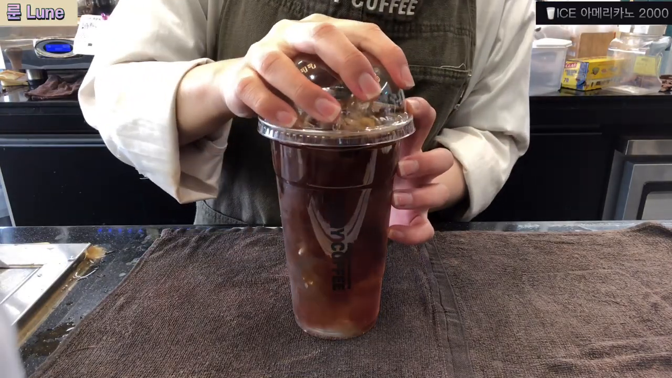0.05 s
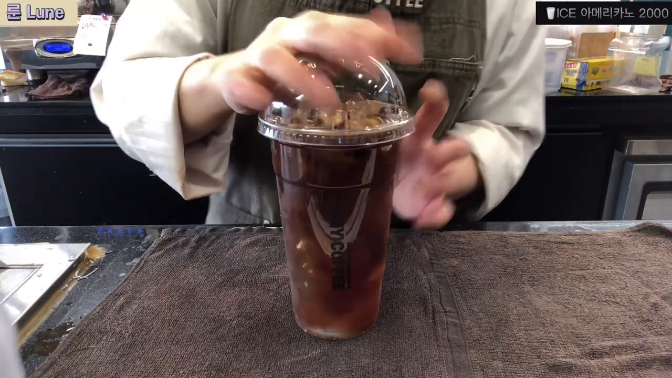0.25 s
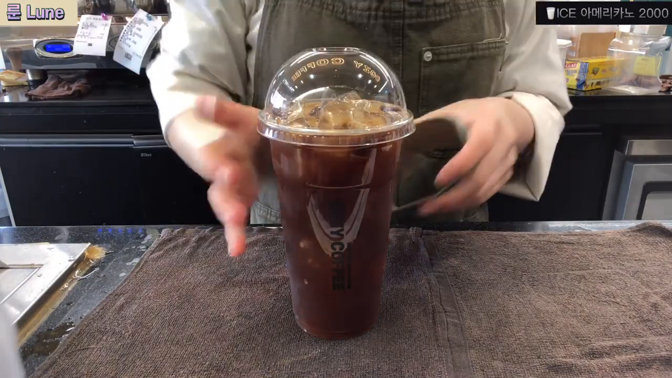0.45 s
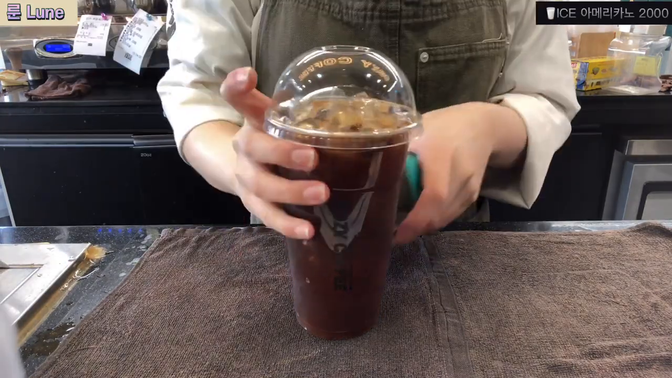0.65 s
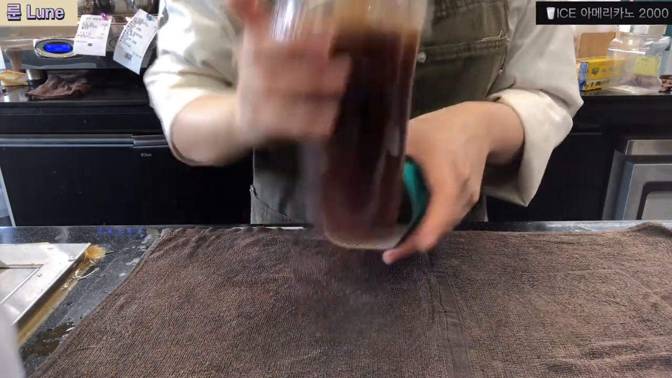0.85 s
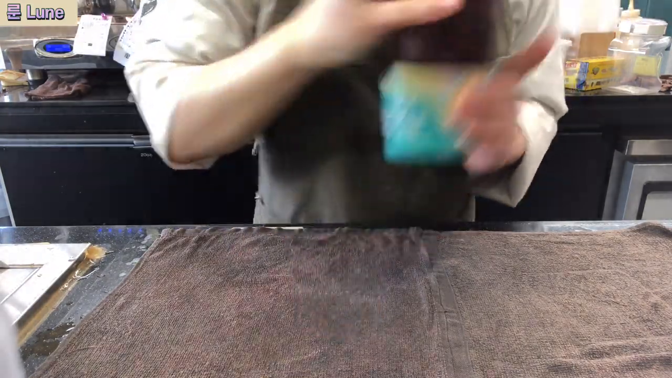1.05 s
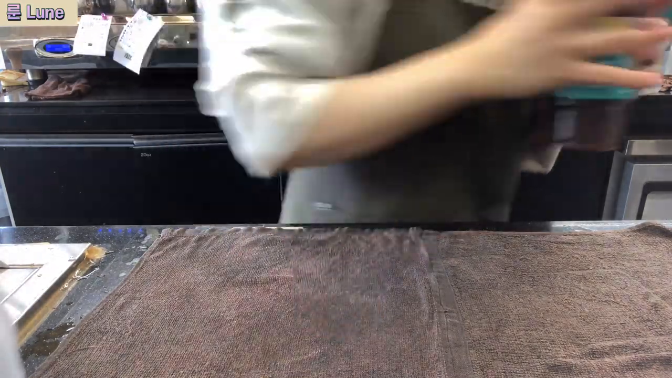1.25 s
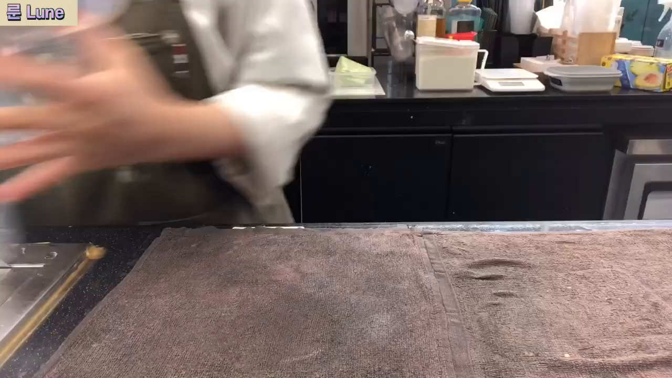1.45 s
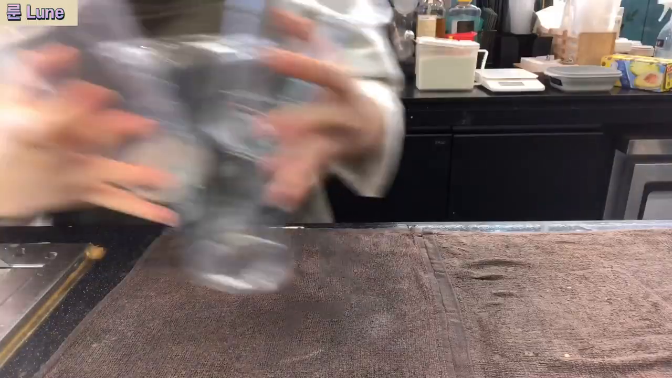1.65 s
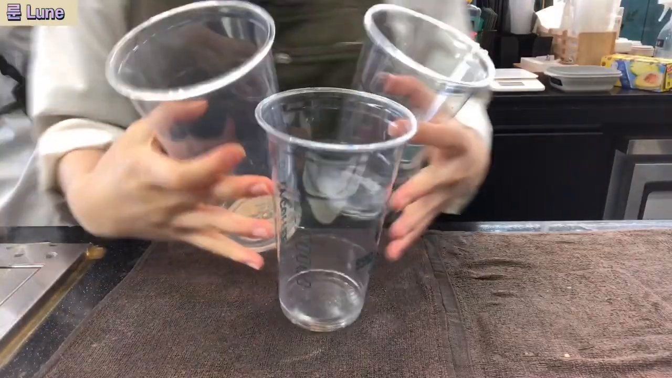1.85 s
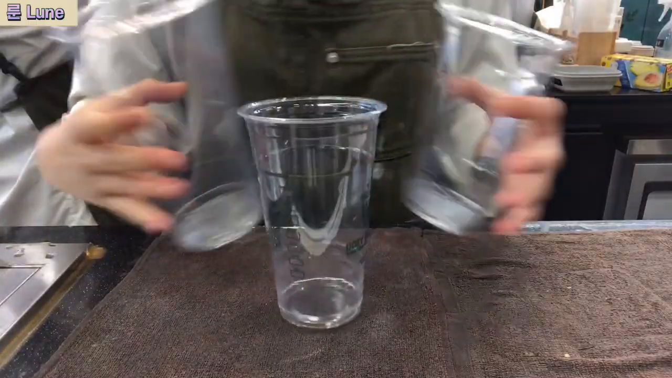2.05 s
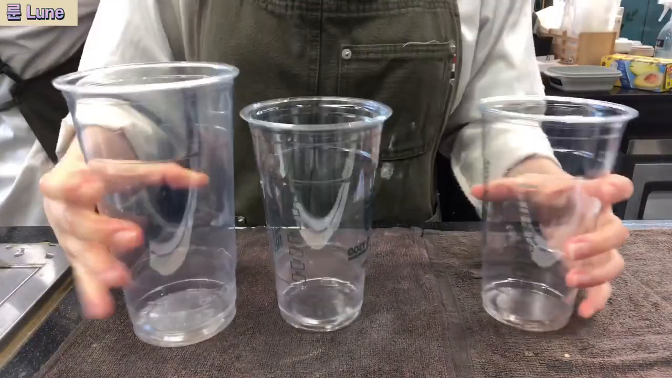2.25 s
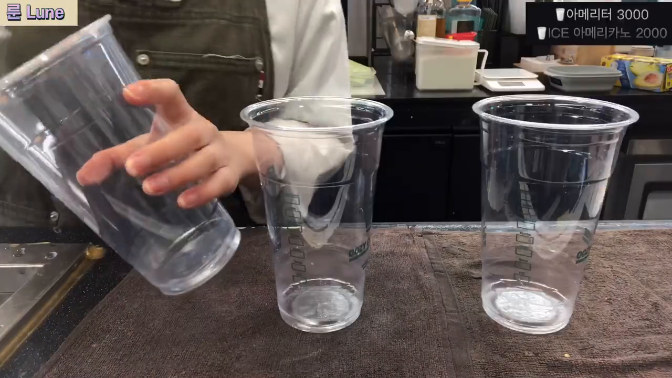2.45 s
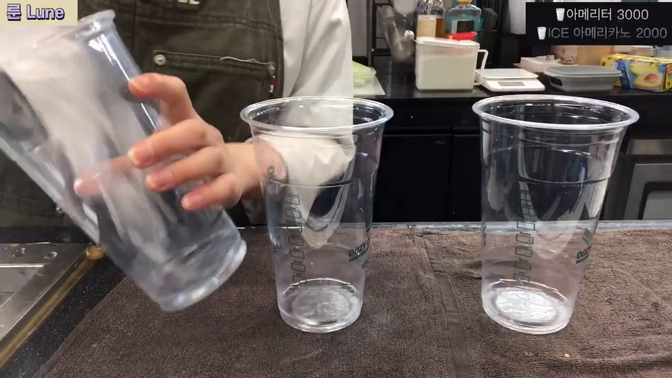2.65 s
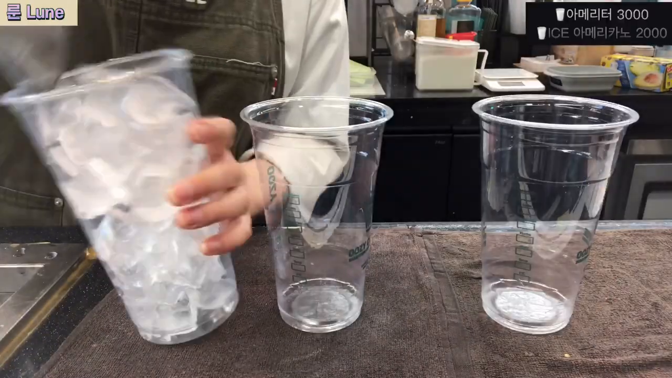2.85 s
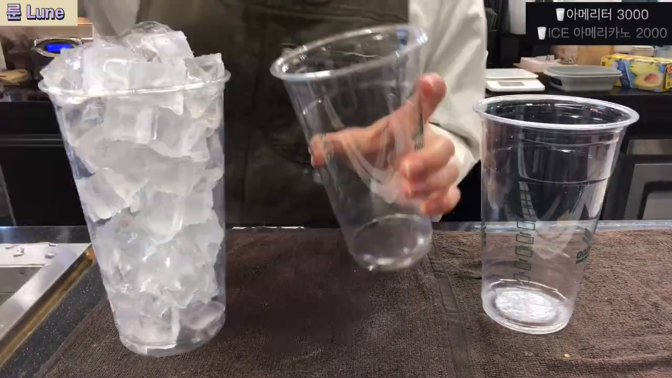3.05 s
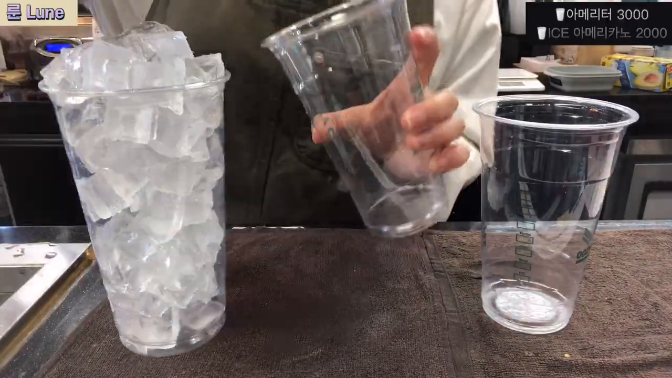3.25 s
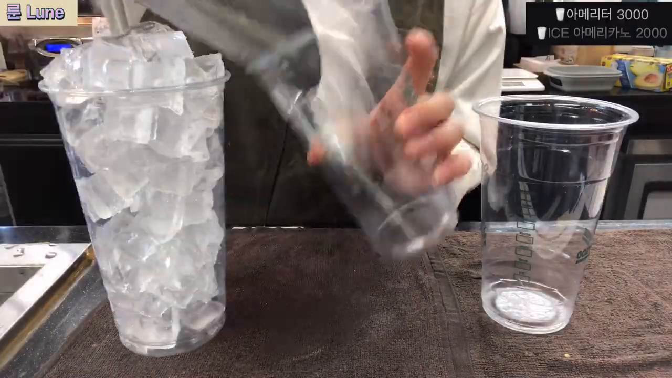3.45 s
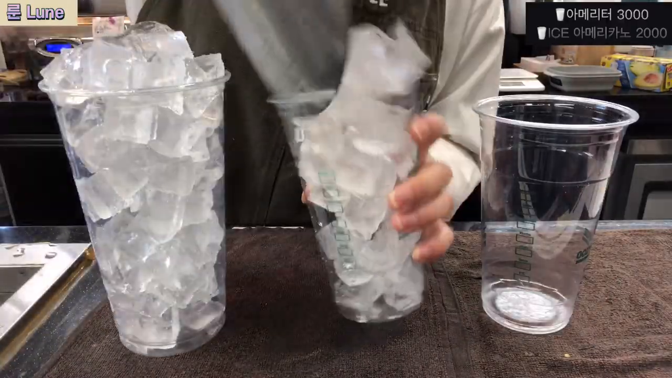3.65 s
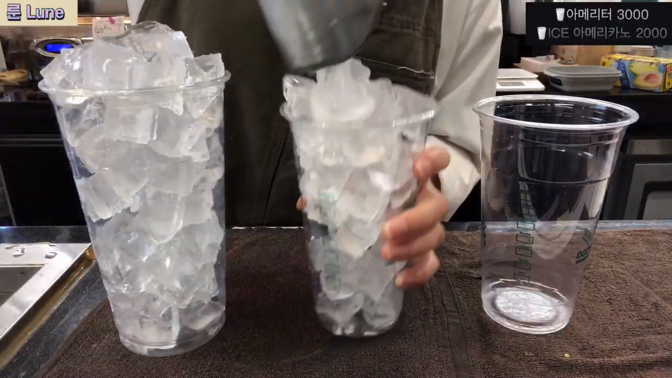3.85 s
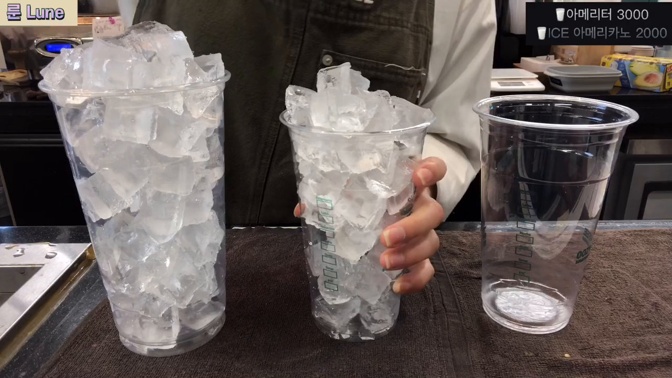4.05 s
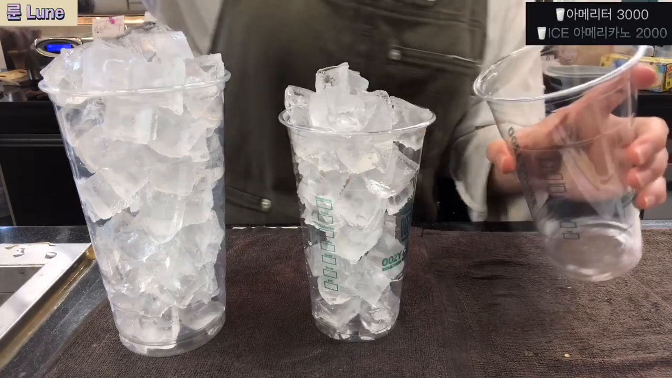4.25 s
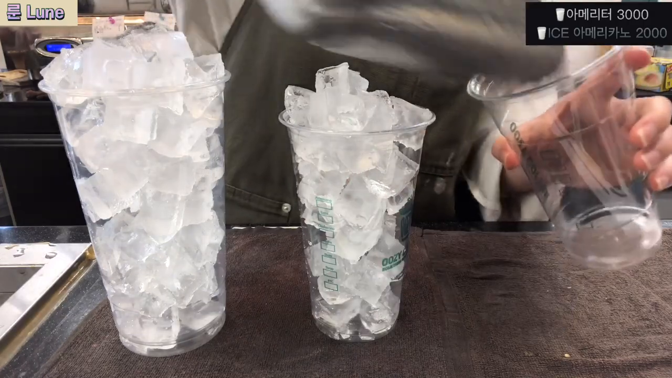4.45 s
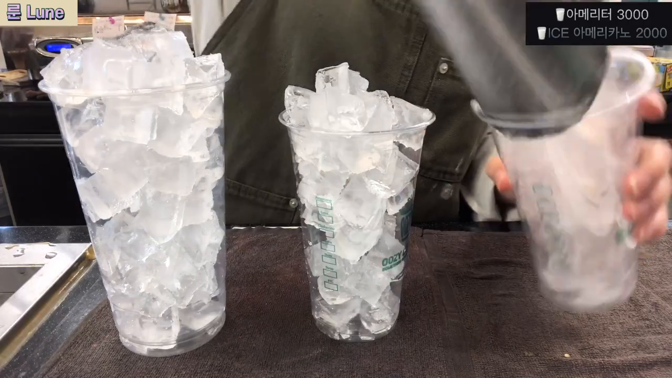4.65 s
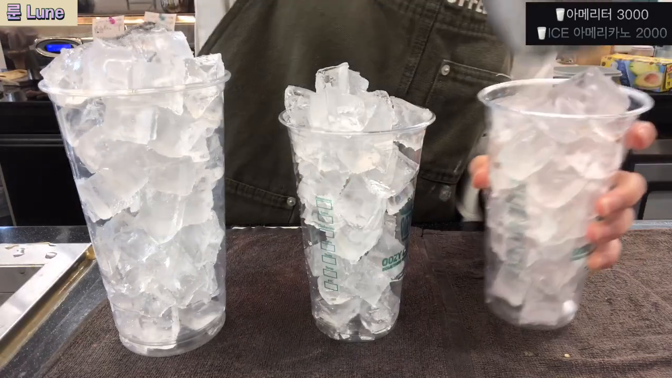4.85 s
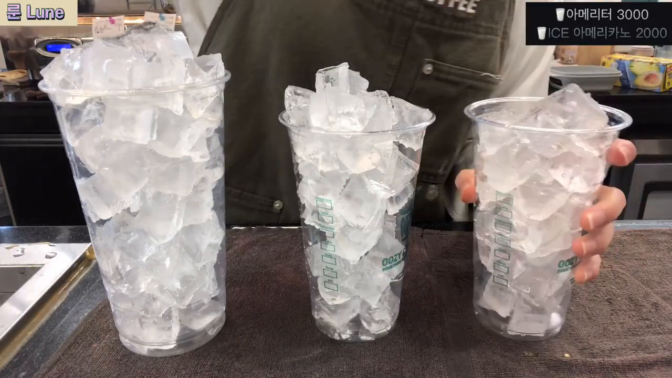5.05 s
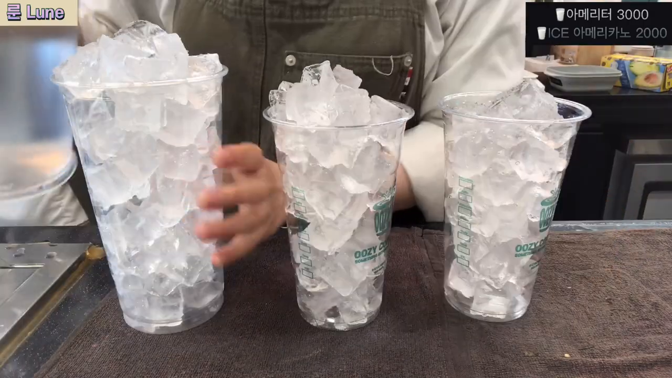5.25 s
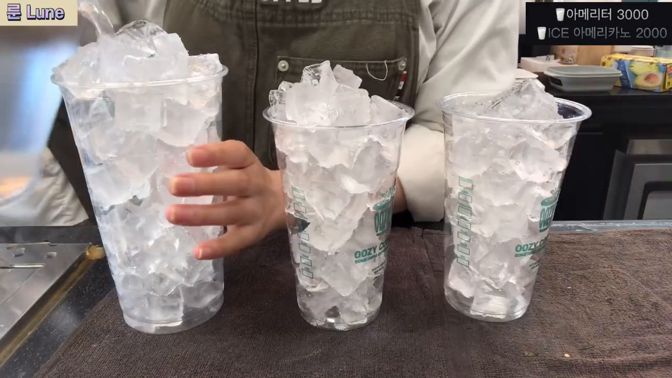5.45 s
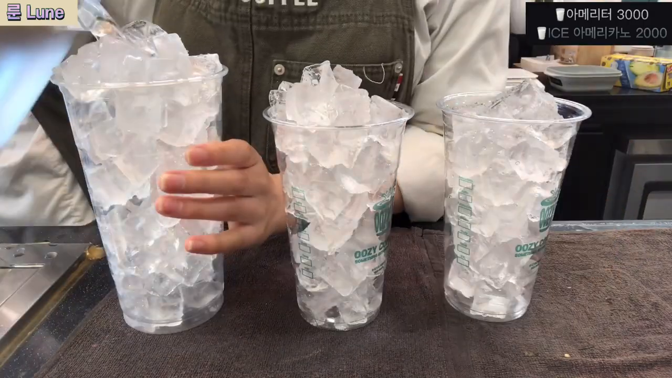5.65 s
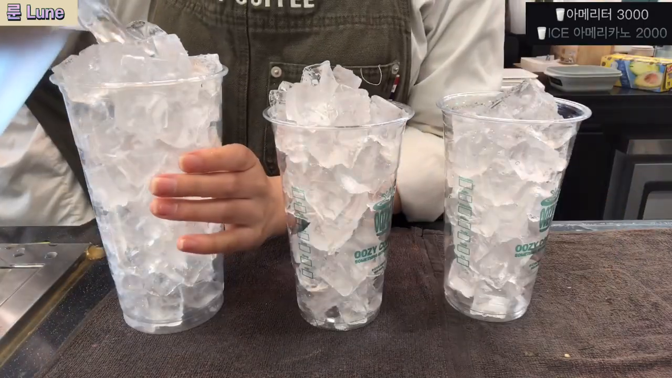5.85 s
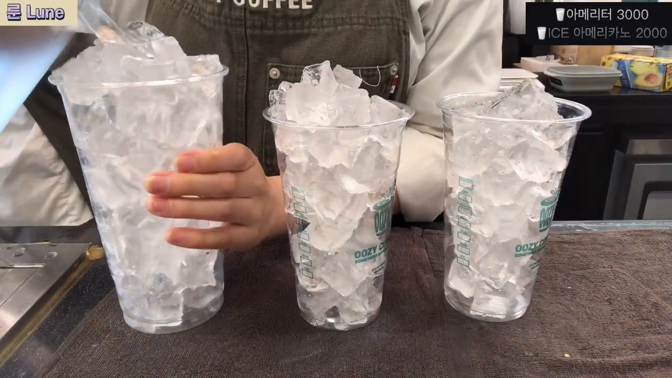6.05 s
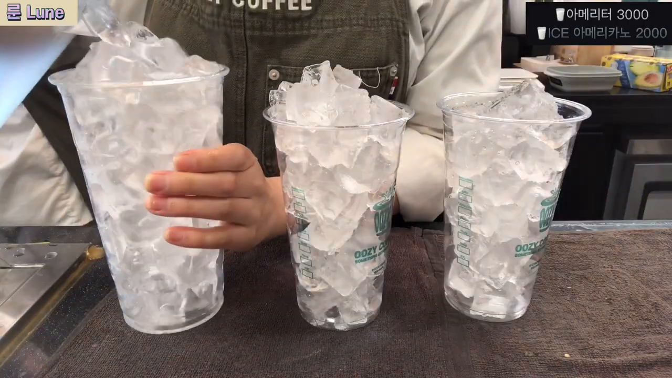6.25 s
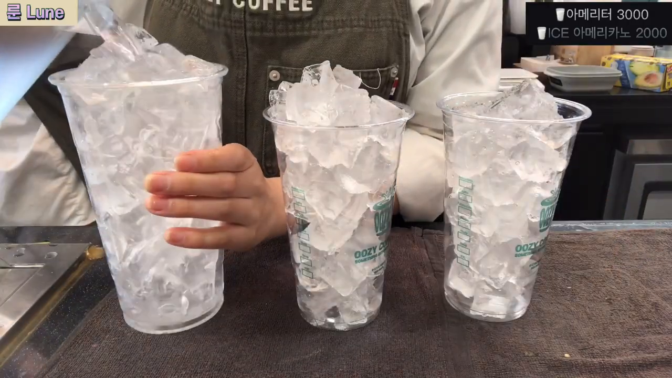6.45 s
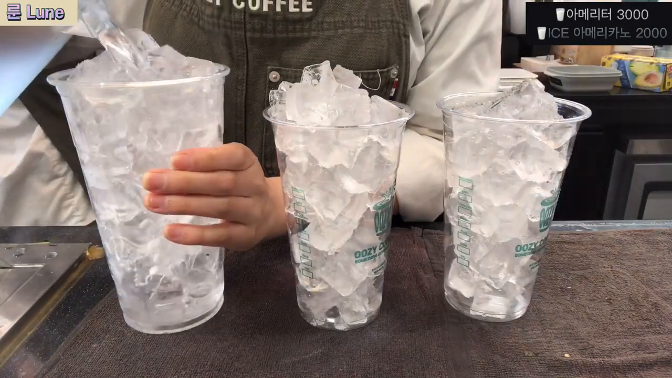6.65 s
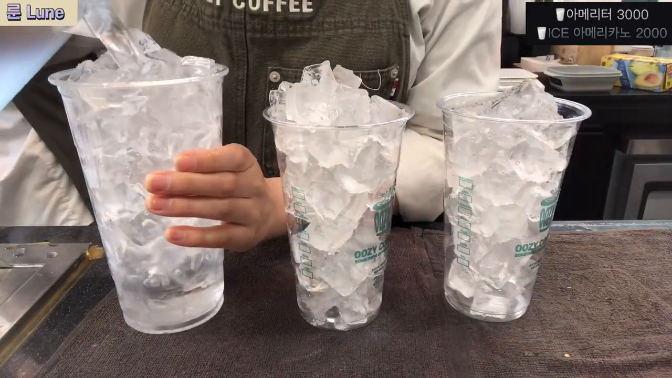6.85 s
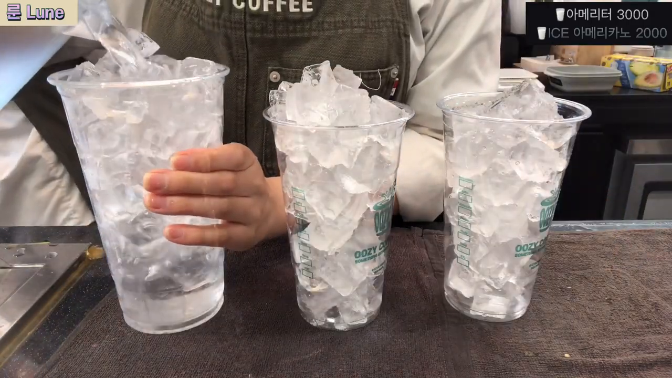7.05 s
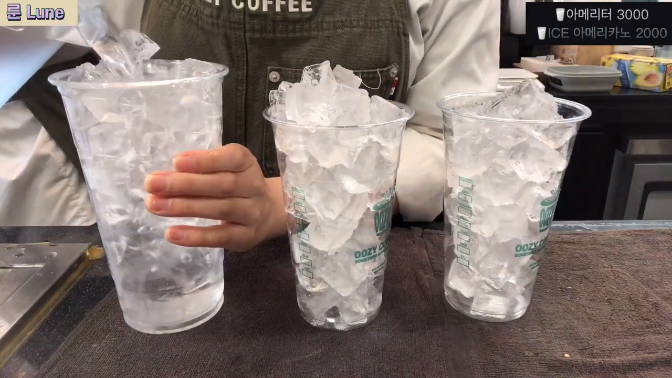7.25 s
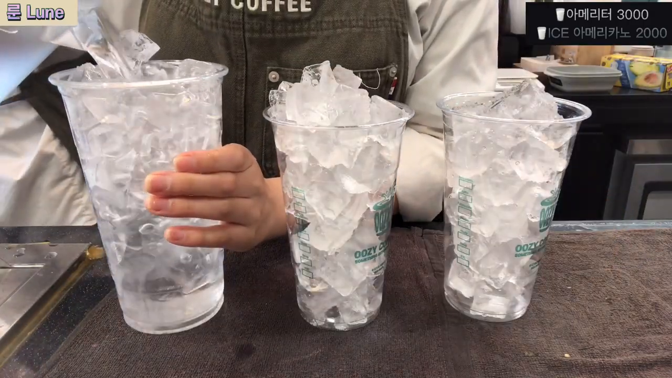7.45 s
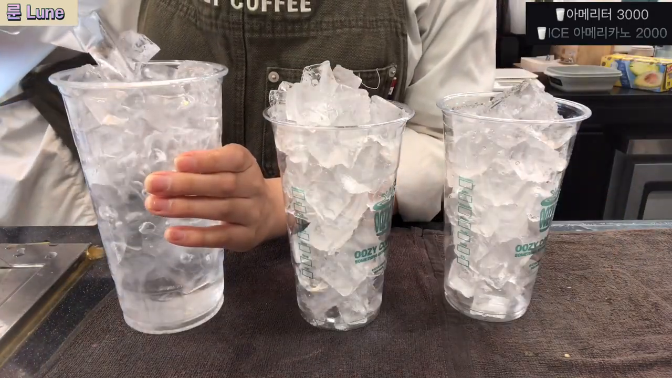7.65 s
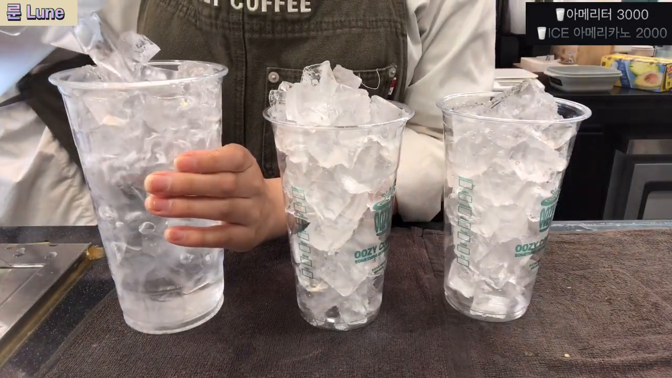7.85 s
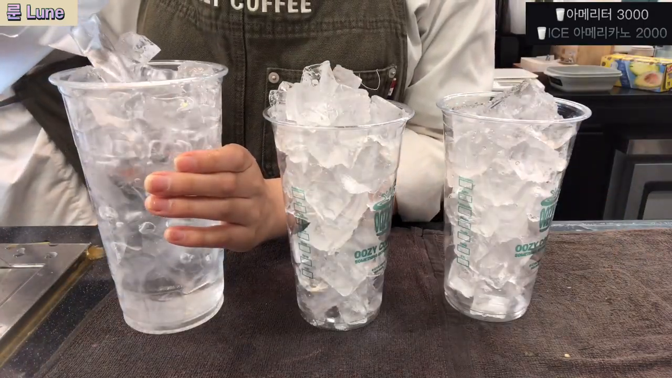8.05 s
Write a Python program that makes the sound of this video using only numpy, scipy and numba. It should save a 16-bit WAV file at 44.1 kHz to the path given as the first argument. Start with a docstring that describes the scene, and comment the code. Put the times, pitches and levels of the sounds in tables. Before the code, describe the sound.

A plastic lid snaps sharply onto a cup right at the start, leaving a brief hissy tail. From about 0.6 to 1.8 seconds, thin plastic cups bump and rub softly, with one stronger knock at 0.8. Empty cups land with a hollow knock near 2.3. Then come the loudest sounds: ice tumbles into three plastic cups, at about 2.7, 3.5 and 4.6 seconds. Each half-second burst clatters, booms hollowly and crackles, with clinks from a metal scoop; the first also thumps the counter. From 5.4 until the end at about 8 seconds, water pours more quietly over the ice, gurgling and fizzing with bubble plinks as cubes slip and crack. A jug rings faintly near 7.6. The sound is close, with a short, dull room echo and faint fridge and fan hum. Six split-second silences cut in, near 0.4, 1.5, 2.3, 3.1, 4.2 and 5.2 seconds.

```python
"""Iced water at a cafe counter

A lid snaps onto a full plastic cup and empty cups are set down. A metal scoop tips ice into three cups
in turn: the cubes clatter on the walls and make the air inside boom. Water is poured over the ice,
which shifts and cracks among bubbles. Fridges and fans hum behind, the small room echoes every knock,
and six short silences break up the sound."""
import sys
import numpy as np
from scipy import signal
from scipy.fft import rfft, irfft, next_fast_len
from scipy.io import wavfile
from scipy.ndimage import uniform_filter1d
from numba import njit

SR = 44100
rng = np.random.default_rng(int(sys.argv[2]) if len(sys.argv) > 2 else 0)


def file_out(sig):
    """Save sig as 16-bit WAV at sys.argv[1]."""
    # one column per channel
    cols = np.atleast_2d(sig).T
    # limit, then scale
    lim = np.clip(cols, -1, 1)
    pcm = np.round(lim * 32767).astype(np.int16)
    wavfile.write(sys.argv[1], SR, pcm)


N = 357651
T, FFT_SIZE = np.arange(N) / SR, next_fast_len(N)
HZ = np.maximum(np.fft.rfftfreq(FFT_SIZE, 1 / SR), 1)


def undb(db):
    """Turn decibels into a gain."""
    return 10 ** (np.asarray(db) / 20)


def unit(x):
    """Scale to an average (rms) level of 1."""
    return x / np.sqrt(np.mean(x ** 2))


def colour(points):
    """A tone curve: the gain at every frequency, drawn through a few points."""
    hz, db = np.transpose(points)
    return undb(np.interp(np.log(HZ), np.log(hz), db))


def peaks(table, lift_db):
    """A tone curve with resonances standing over a flat base."""
    return 1 + sum(undb(db + lift_db) / (1 + ((HZ - hz) / (width / 2)) ** 2) for hz, width, db in table)


def three_bands(x, tone, low_hz, high_hz):
    """Apply a tone curve, then split into bass, middle and treble, each at level 1."""
    low = 1 / (1 + (HZ / low_hz) ** 6)
    high = 1 / (1 + (high_hz / HZ) ** 6)
    spectrum = rfft(x, FFT_SIZE) * tone
    return [unit(irfft(spectrum * part, FFT_SIZE)[:N]) for part in (low, 1 - low - high, high)]


@njit
def moving_band(x, hz, width_hz):
    """Let through only the sound near a moving pitch."""
    out, band_state, low_state = np.empty(len(x)), 0., 0.
    for i in range(len(x)):
        tuning, damping = np.tan(np.pi * hz[i] / SR), width_hz / hz[i]
        passed = (band_state + tuning * (x[i] - low_state)) / (1 + tuning * (tuning + damping))
        band_state = 2 * passed - band_state
        low_state += 2 * tuning * passed
        out[i] = damping * passed
    return out


def band(x, hz, width_hz):
    """One steady resonance, at level 1."""
    return unit(moving_band(x, np.full(len(x), float(hz)), float(width_hz)))


@njit
def notes(start, hz, size, decay_s, glide):
    """Add up short fading notes; a glide of 1 adds the starting pitch again each second."""
    out = np.zeros(N)
    for k in range(len(start)):
        first, step = int(start[k]), 2 * np.pi * hz[k] / SR
        keep = np.exp(-1 / (decay_s[k] * SR))
        turn, bend = keep * np.exp(1j * step), np.exp(1j * step * glide / SR)
        wave, softening = size[k] + 0j, 1.
        for i in range(first, min(first + int(5 * decay_s[k] * SR), N)):
            wave *= turn
            turn *= bend
            softening *= keep ** 3
            out[i] += wave.imag * (1 - softening)
    return out


def tiny_taps(per_s, scatter, ring_s, wash):
    """Random contacts, each ringing at its own pitch, over a noisy wash of the finest ones."""
    when, pitch, size, fade = rng.random((int(per_s * N / SR), 4)).T
    strength = undb(-scatter * np.log(size + 0.0017))
    taps = notes(when * N, 16000 * pitch + 50, strength, ring_s * (0.55 + fade), 0.)
    return unit(taps) + wash * rng.standard_normal(N)


def wander(per_s):
    """A smooth random drift."""
    hold = int(SR / per_s)
    steps = np.repeat(rng.standard_normal(N // hold + 1), hold)
    return uniform_filter1d(uniform_filter1d(steps, hold), hold)[:N]


def swell(start_s, fade_s, rise_s):
    """Place and shape of a level that climbs, then falls 60 dB in fade_s."""
    t = np.arange(int((rise_s + fade_s) * SR)) / SR
    rise = np.sin(np.pi / 2 * np.minimum(t / rise_s, 1)) ** 2
    shape = rise * undb(-60 * np.maximum(t - rise_s, 0) / fade_s)
    start = int((start_s - rise_s / 2) * SR)
    return slice(start, min(start + len(t), N)), shape[:N - start]


def ring(tones, hits, push_s):
    """A struck thing rattles as it rings; where the blow lands favours one tone and misses another."""
    out, t = np.zeros(N + SR), T[:SR // 2]
    for start_s, hit_db, favoured_hz, falloff_db, missed_hz in hits:
        for hz, db, fade_s in tones:
            shape = undb(-60 * t / fade_s) * np.minimum(t / push_s, 1)
            size = undb(hit_db + db - falloff_db * abs(np.log2(hz / favoured_hz)))
            size *= min(.05 + 8 * np.log2(hz / missed_hz) ** 2, 1)
            rattle = 1 + 1.2 * uniform_filter1d(rng.standard_normal(len(t)), size=100)
            out[int(start_s * SR):][:len(t)] += size * shape * np.sin(2 * np.pi * hz * t) * rattle
    return out[:N]


def flurries(table, taps, tone, rise_s, air_width_hz, air_share, wall_share, wall_q):
    """Bursts of taps on a cup: its air booms, its wall clatters around one note, the treble crackles."""
    low, mid, high = three_bands(taps, tone, 530, 2190)
    out = np.zeros(N)
    for start_s, clatter_db, boom_db, crackle_db, wall_hz, air_hz, fade_s in table:
        at, shape = swell(start_s, fade_s, rise_s)
        # the first blow strikes the air cleanly, later taps roughen it
        air = np.sin(2 * np.pi * (air_hz * T[:len(shape)] + rng.random()))
        air += 0.16 * band(taps[at], air_hz, air_width_hz)
        boom = air_share * air + (1 - air_share) * low[at]
        wall = band(taps[at], wall_hz, wall_hz / wall_q)
        clatter = shape * (wall_share * wall + (1 - wall_share) * mid[at])
        out[at] += undb(clatter_db) * clatter / np.abs(clatter).max()
        out[at] += shape * (undb(boom_db) * boom + undb(crackle_db) * high[at])
    return out


# background noise, one row for each stretch between silences: bass_db, middle_db, treble_db
FAN_LEVELS = [(-45.5, -54, -48.5), (-48, -55, -57), (-49, -54, -60), (-46, -50.5, -53.5), (-47.5, -54, -61),
              (-47, -53.5, -59.5), (-48.5, -54, -65)]
# tone of that noise: pitch_hz, gain_db
FAN_TONE = [(15, -70), (25, -53), (45, -10.5), (110, -0.5), (300, -1.5), (420, -9), (720, -18.5),
            (1500, -18), (2300, -19.5), (4300, -23.5), (7500, -31.5), (8500, -38.5), (15600, -42.5)]
# motor hums: start_s, stop_s, pitch_hz, level_db
MOTORS = [(0, 4.4, 341, -51.5), (0, 1.47, 235, -52.5), (.44, 1.47, 175.5, -51), (1.551, 2.1, 243, -52),
          (1.55, 9.3, 120, -62.5), (3.141, 6, 196, -58.5), (5.291, 6.0, 175, -54), (6.9, 8.9, 264, -59),
          (6.901, 8.9, 308, -51), (7.0, 8.9, 339, -53), (7.2, 9.1, 470.6, -56.5)]
def fridges_and_fans():
    """Three bands of noise waver on their own, with motors humming in the bass."""
    stretch = np.searchsorted([stop_s for stop_s, _ in SILENCES], T)
    parts = three_bands(rng.standard_normal(N), colour(FAN_TONE), 450, 1100)
    out = np.zeros(N)
    for db, part in zip(np.transpose(FAN_LEVELS), parts):
        out += undb(db[stretch] + 2 * wander(per_s=4.7)) * part
    for start_s, stop_s, hz, db in MOTORS:
        at = slice(int(start_s * SR), int(stop_s * SR))
        hum = band(rng.standard_normal(len(T[at])), hz, width_hz=6)
        out[at] += undb(db) * hum * signal.windows.tukey(len(hum), .2)
    return out


def room_echo(x, fade_s=0.36):
    """The small room answers with a short, dull wash of echoes."""
    t = T[:SR]
    tail = rng.standard_normal(SR) * undb(-60 * t / fade_s) * np.minimum(t / 0.0016, 1)
    tail = signal.lfilter([1], [1, -.5], tail)
    return signal.fftconvolve(x, tail / np.sqrt(np.sum(tail ** 2)))[:N]


# a short hiss: start_s, level_db, pitch_hz, width_hz, fade_s
HISSES = [(6.773, -40, 9900, 7340, 0.37)]
def hiss():
    """A brief spit of high noise."""
    out = np.zeros(N)
    for start_s, db, hz, width_hz, fade_s in HISSES:
        at, shape = swell(start_s, fade_s, rise_s=0.005)
        noise = band(rng.standard_normal(len(shape)), hz, width_hz)
        out[at] += undb(db) * shape * band(noise, hz, width_hz)
    return out


# the jug's ringing tones: pitch_hz, level_db, fade_s
JUG_TONES = [(2137, 0, .6), (3200, -5, .11), (3779, -16, .3), (3973, -10, .2), (5179, -18, .3),
             (5485, -8, .4), (5515, -5, .4), (6966, -7.5, .33), (8958, -4, .22), (10760, -12, .2),
             (12800, -20, .1), (14450, -14, .12), (15100, -17, .06)]
# knocks on it: start_s, level_db, favoured_hz, falloff_db_per_octave, missed_hz
JUG_KNOCKS = [(7.556, -37, 2137, 1.5, 500), (7.639, -46.5, 5990, 16, 2139)]
def jug():
    """The lightly knocked jug rings high and clear."""
    return ring(JUG_TONES, JUG_KNOCKS, push_s=0.0072)


# an empty cup's tones: pitch_hz, level_db, fade_s
CUP_TONES = [(345, -1.5, 0.24), (477, 3.5, 0.14), (645, -4, 0.11), (1197, -11, 0.068)]
# cups touching down: start_s, level_db, favoured_hz, falloff_db_per_octave, missed_hz
CUP_LANDINGS = [(1.868, -39.5, 474, 15, 3000), (2.266, -22.5, 463, -1.5, 3000)]
def empty_cups():
    """Empty cups give a hollow knock as they are set down."""
    return ring(CUP_TONES, CUP_LANDINGS, push_s=0.0046)


# the counter top's tones: pitch_hz, level_db, fade_s
COUNTER_TONES = [(65, -10.5, 0.3), (122, 7, 0.12), (201.6, -0.5, 0.21), (275, 2.5, 0.096)]
# blows that reach it: start_s, level_db, favoured_hz, falloff_db_per_octave, missed_hz
COUNTER_BLOWS = [(0.075, -41, 125, 12.5, 900), (2.27, -24.5, 205, 15, 900), (2.758, -13, 218, 12.5, 900),
                 (2.777, -17.5, 120, 1.5, 900)]
def counter():
    """Heavier blows make the counter top thump."""
    return ring(COUNTER_TONES, COUNTER_BLOWS, push_s=0.017)


# tone of thin plastic: pitch_hz, gain_db
PLASTIC_TONE = [(60, -15), (140, -20), (500, 4), (950, -4.5), (1300, -3.5), (1900, -9.5), (3000, -13),
                (6000, -14.5), (9000, -20), (15600, -36)]
# sleeve and cups bumping: start_s, clatter_db, boom_db, crackle_db, wall_hz, air_hz
BUMPS = [(0.643, -40, -62, -64, 1920, 353), (0.73, -28.5, -48, -42.5, 945, 530),
         (0.802, -16, -28.5, -34, 920, 745), (0.978, -41, -51, -65, 950, 340),
         (1.088, -35, -53, -56, 850, 766), (1.191, -43, -51, -48, 966, 325),
         (1.221, -38.5, -61, -49, 1650, 355), (1.318, -46, -61, -64, 930, 324),
         (1.417, -47, -49, -51.5, 1190, 390), (1.805, -40.5, -57, -60, 1050, 501)]
# hands, sleeve and cups rubbing: start_s, scrape_db, swish_db, rise_s, fade_s
RUBS = [(1.11, -44, -59, 0.06, 0.4), (1.22, -48, -52, 0.033, 0.14), (1.74, -60, -65, 0.12, 0.62),
        (.9, -56.5, -71, 0.087, .6), (2.601, -53, -60, 0.34, .9), (4.0, -49, -67, 0.045, 0.46),
        (4.45, -57, -60.5, 0.3, .5)]
def handled_cups(taps, bump_fade_s=0.055):
    """Thin plastic cups knock and rub in the hands."""
    tone = colour(PLASTIC_TONE) * peaks([(945, 78, 0)], lift_db=6.1)
    out = flurries([(*row, bump_fade_s) for row in BUMPS], taps, tone,
                   rise_s=0.019, air_width_hz=150, air_share=0.58, wall_share=0.42, wall_q=9.7)
    _, scrape, swish = three_bands(taps[::-1], tone, 950, 4400)
    for start_s, scrape_db, swish_db, rise_s, fade_s in RUBS:
        at, shape = swell(start_s, fade_s, rise_s)
        out[at] += shape * (undb(scrape_db) * scrape[at] + undb(swish_db) * swish[at])
    return out


# tone of the lid: pitch_hz, gain_db
LID_TONE = [(35, -47), (60, -18), (142, -6.5), (231, -6.5), (266, -8.5), (465, -11), (498, 4.5),
            (629, -18.5), (1260, -19.5), (2660, -10), (6740, -14), (9120, -31.5), (12100, -25.5),
            (15600, -48)]
# its clicks: start_s, clatter_db, boom_db, crackle_db, wall_hz
LID_SNAPS = [(0.01, -36.5, -54, -46, 2620), (0.067, -19, -34.5, -21, 2480),
             (0.082, -21.5, -24, -32.5, 2550), (0.337, -42, -62, -54, 1810)]
# the bright, hissy tail after the snap: start_s, level_db, fade_s
LID_TAIL = [(0.064, -31.5, 0.4), (.12, -46, 0.76)]
def lid(taps, air_hz=513, snap_fade_s=0.066):
    """The pressed lid clicks home, and a bright, hissy tail fades after it."""
    tone = colour(LID_TONE)
    out = flurries([(*row, air_hz, snap_fade_s) for row in LID_SNAPS], taps, tone,
                   rise_s=0.018, air_width_hz=160, air_share=0.55, wall_share=0.44, wall_q=5)
    _, _, tail = three_bands(taps[::-1], tone * peaks([(2870, 800, 0)], lift_db=5.3), 450, 1900)
    for start_s, db, fade_s in LID_TAIL:
        at, shape = swell(start_s, fade_s, rise_s=.03)
        out[at] += undb(db) * shape * tail[at]
    return out


# cracks in the ice: start_s, peak_db
ICE_CRACKS = [(5.4612, -62), (6.1272, -49), (6.1586, -44), (6.194, -48), (6.2284, -46), (6.3841, -42),
              (6.4559, -59), (6.4943, -56), (6.625, -53), (6.6505, -50), (6.7029, -42), (6.7772, -38),
              (7.064, -54), (7.3743, -63), (7.5644, -46), (7.97, -42)]
def cracking_ice(hz=7500, width_hz=5000):
    """Cold ice cracks with sharp ticks as the water reaches it."""
    out = np.zeros(N)
    ticks = tiny_taps(per_s=2800, scatter=2.6, ring_s=0.00086, wash=0.32)
    for start_s, db in ICE_CRACKS:
        at, shape = swell(start_s, fade_s=.04, rise_s=0.0087)
        crack = shape * band(band(ticks[at], hz, width_hz), hz, width_hz)
        out[at] += undb(db) * crack / np.abs(crack).max()
    return out


# single bubbles that stand out: start_s, level_db, pitch_hz
LOUD_BUBBLES = [(5.491, -30, 1480), (5.695, -41, 1980), (5.694, -37, 3760), (5.86, -33, 2550),
                (6.337, -43, 1960), (6.5245, -42, 2010), (7.269, -36, 1656), (7.38, -38, 2600),
                (7.695, -37, 1320), (7.715, -38, 913), (7.83, -40, 1520), (7.91, -43, 1070),
                (7.916, -34, 1493), (7.952, -37, 1940)]
def plinks(cycles=8.6):
    """Each bubble rings with a slightly rising note."""
    start_s, db, hz = np.transpose(LOUD_BUBBLES)
    return notes(start_s * SR, hz, undb(db), cycles / hz, glide=1.45)


def bubbles(per_s, low_hz, high_hz, cycles):
    """Trapped air rings in short rising notes at random times."""
    when, pitch, size = rng.random((int(per_s * N / SR), 3)).T
    hz = low_hz * (high_hz / low_hz) ** pitch
    return unit(notes(when * N, hz, undb(-14 * size), cycles / hz, glide=11.8))


FLOODED_S = 6.15  # the water has filled the gaps between the cubes
# tone of the cup with water in it: pitch_hz, gain_db
WET_TONE = [(35, -47), (60, -17), (87, -14), (216, 19), (313, 18), (404, 11.5), (850, 2.5), (1210, -7.5),
            (1590, -3.5), (4430, -18.5), (15600, -46)]
# loudness of the pour: time_s, gurgle_db, fizz_db
WATER_FLOW = [(5.31, -56.5, -65), (5.44, -65, -68), (5.46, -36.5, -49), (5.54, -51, -58.5),
              (5.77, -62.5, -64), (5.86, -46.5, -57.5), (5.95, -57, -65.5), (6.21, -39, -44),
              (6.53, -47.5, -53.5), (6.55, -57, -62), (6.7, -37.5, -48), (6.76, -48.5, -53),
              (6.78, -48.5, -55), (6.98, -56, -61.5), (7.1, -43, -53.5), (7.23, -59, -62.5),
              (7.28, -50.5, -59), (7.53, -57, -70), (7.56, -48, -50.5), (7.89, -59.5, -68),
              (7.92, -51.5, -63), (8.1, -63.5, -61)]
def pouring_water():
    """The stream gurgles and fizzes; air between the cubes sounds hollow until water fills the gaps."""
    time_s, gurgle_db, fizz_db = np.transpose(WATER_FLOW)
    drops = tiny_taps(per_s=8000, scatter=3.1, ring_s=0.0033, wash=0.96)
    _, splash, fizz = three_bands(drops, colour(WET_TONE), 835, 3400)
    gurgle = unit(splash + 0.47 * bubbles(per_s=500, low_hz=1109, high_hz=4840, cycles=6.7))
    stream = undb(np.interp(T, time_s, gurgle_db)) * gurgle + undb(np.interp(T, time_s, fizz_db)) * fizz
    hollow = sum(undb(db) * band(rng.standard_normal(N), hz, width_hz)
                 for hz, width_hz, db in [(720, 200, -51.5), (675, 14, -55.5), (746, 11, -53)])
    stream += undb(-60 * np.maximum(T - FLOODED_S, 0)) * hollow
    return (T > time_s[0]) * stream


# cubes slipping in the water: start_s, clatter_db, boom_db, crackle_db, wall_hz
ICE_SLIPS = [(5.461, -44, -39, -47, 1430), (5.696, -47, -45, -51, 1480), (5.815, -40, -36.5, -49, 921),
             (5.862, -38, -38, -46, 1510), (5.996, -49, -37.5, -47.5, 940), (6.059, -47, -53, -50, 1670),
             (6.122, -32.5, -36.5, -46, 1550), (6.189, -28.5, -34, -38, 1860),
             (6.221, -35, -29.5, -40, 923), (6.342, -36, -41.5, -46, 1990), (6.383, -27, -38.5, -36, 1090),
             (6.45, -36, -37.5, -43, 3700), (6.496, -40, -55, -43.5, 1510), (6.528, -44, -45, -51, 1630),
             (6.642, -30.5, -32, -43.5, 1370), (6.696, -34, -48, -52, 1440), (6.782, -40, -42, -42, 1750),
             (6.823, -44, -40, -46.5, 1800), (7.076, -38, -44, -45, 2330), (7.149, -36, -41, -53, 1770),
             (7.296, -42, -56, -53, 1490), (7.377, -52, -59, -44, 2530), (7.697, -44, -59, -52, 2160),
             (7.749, -47, -43, -54, 2340), (7.913, -39, -53, -52, 1062), (7.954, -49, -47, -68, 1910)]
def shifting_ice(dry_hz=748, flooded_hz=401, fade_s=0.093):
    """Wet cubes slip and knock on the cup; its boom is lower once the gaps are flooded."""
    air_hz = np.where(T < FLOODED_S, dry_hz, flooded_hz) * (1 + 0.101 * wander(per_s=13))
    slips = [(*row, air_hz[int(row[0] * SR)], fade_s) for row in ICE_SLIPS]
    taps = tiny_taps(per_s=5000, scatter=3, ring_s=0.0055, wash=0.44)
    return flurries(slips, taps, colour(WET_TONE),
                    rise_s=0.0168, air_width_hz=110, air_share=0.42, wall_share=0.42, wall_q=19)


# the scoop's tones: pitch_hz, level_db, fade_s
SCOOP_TONES = [(2128, -3, .22), (2885, 2, .04), (2890, -6, .13), (3828, -10, .07), (4200, -12, .06),
               (4352, -4, .18), (5950, -4, .15), (6180, -8, .09), (6700, -8, .07), (8080, -9, .07),
               (9700, -18, .07), (10310, -18.5, .06), (12070, -21, .08)]
# cubes striking it: start_s, level_db, favoured_hz, falloff_db_per_octave, missed_hz
SCOOP_CLINKS = [(2.892, -17, 2900, 33, 6000), (3.69, -30, 4300, 30, 6000), (3.806, -13, 2890, 9.5, 12000),
                (3.866, -33.5, 2890, 21, 6000), (4.745, -28, 6700, 17, 4400), (4.817, -20, 4440, 7.5, 6050)]
def scoop():
    """The metal scoop clinks when a cube hits it."""
    return ring(SCOOP_TONES, SCOOP_CLINKS, push_s=0.007)


# tone of ice in a cup: pitch_hz, gain_db
ICE_TONE = [(35, -67), (60, -16.5), (118, -12), (272, -2), (423, 11), (850, -12.5), (1350, -12),
            (1880, -17.5), (2060, -12.5), (6900, -22.5), (11000, -32), (15600, -35)]
# wall resonances, one list per cup: pitch_hz, width_hz, gain_db
WALL_TONES = [
    [(820, 48, -5), (970, 42, 3.5), (1272, 62, -3.5), (1876, 22, 3), (3120, 21, -4.5), (3440, 38, -19.5),
     (3660, 27, -0.5), (4600, 53, -3.5)],
    [(940, 18, -2.5), (1290, 23, -13.5), (1434, 100, -1), (2410, 61, -15.5), (2980, 130, -24),
     (3750, 170, -23), (4020, 76, -6.5), (4510, 81, -24.5)],
    [(922, 23, -3), (1225, 35, 4), (1560, 120, -2.5), (2380, 100, -9.5), (2860, 83, -30), (3300, 18, -12.5),
     (3850, 80, -18), (4500, 30, -10.5)],
]
# the stream of cubes, one list per cup: time_s, clatter_db, air_hz
ICE_POURS = [
    [(2.67, -57, 488), (2.706, -27.5, 444), (2.722, -23, 373), (2.734, -31.5, 354), (2.762, -28, 370),
     (2.802, -21, 504), (2.868, -19, 416), (2.878, -24, 428), (2.912, -28.5, 426), (3.066, -47, 444)],
    [(3.44, -57, 413), (3.45, -45, 432), (3.512, -29.5, 440), (3.528, -39, 436), (3.588, -18.5, 495),
     (3.654, -17, 506), (3.794, -36.5, 474), (3.81, -35.5, 470), (3.828, -37, 473), (4.1, -65, 360)],
    [(4.5, -54.5, 380), (4.606, -28.5, 451), (4.618, -25.5, 516), (4.636, -33, 598), (4.662, -17.5, 610),
     (4.764, -22.5, 518), (4.8, -42.5, 580), (4.858, -39.5, 446), (4.92, -45.5, 475), (5.0, -56, 340)],
]
# heaps landing: start_s, clatter_db, boom_db, crackle_db, wall_hz, air_hz, fade_s
ICE_HEAPS = [(2.7, -21, -29, -42, 840, 446, 0.073), (2.717, -25, -30, -33, 806, 431, 0.11),
             (2.748, -28, -6, -31, 821, 338, 0.1), (2.779, -11.5, -5.5, -24.5, 1310, 533, 0.094),
             (2.804, -4.5, -7, -45, 1094, 467, 0.076), (2.826, -9.5, -10.5, -34, 1300, 375, 0.08),
             (2.841, -23, -16, -24, 1330, 423, 0.08), (2.854, -8, -6, -23.5, 751, 437, 0.05),
             (2.866, -11.5, -12, -22.5, 820, 413, 0.032), (2.876, -13.5, -12.5, -20, 826, 421, 0.11),
             (2.912, -31, -34, -29.5, 2890, 442, 0.22), (3.453, -29, -24.5, -31, 3300, 439, 0.042),
             (3.498, -19, -16, -28.5, 2210, 446, 0.094), (3.545, -37, -39, -26, 2380, 415, 0.096),
             (3.569, -17, -21.5, -21, 2500, 484, 0.14), (3.594, -15, -9.5, -19.5, 2630, 541, 0.067),
             (3.621, -14, -11.5, -39, 930, 430, 0.091), (3.649, -14.5, -12.5, -22.5, 1190, 657, 0.14),
             (3.688, -26, -25, -21.5, 1420, 534, 0.097), (3.747, -21, -42, -26.5, 2240, 493, 0.085),
             (3.776, -30, -31, -28.5, 3620, 384, 0.098), (3.807, -33, -44, -26, 2680, 570, 0.058),
             (3.862, -33, -41, -35, 2130, 417, 0.097), (3.911, -31, -31, -43, 2120, 431, 0.07),
             (4.018, -42, -46, -49.5, 870, 328, 0.1), (4.615, -15.5, -17, -25.5, 2060, 428, 0.058),
             (4.653, -10, -5.5, -27, 1190, 621, 0.1), (4.677, -13.5, -5.5, -29, 1175, 600, 0.077),
             (4.707, -12, -17, -19.5, 1186, 495, 0.093), (4.73, -26, -30, -19.5, 3900, 538, 0.14),
             (4.752, -19, -24, -32.5, 1620, 500, 0.12), (4.818, -55, -49, -31.5, 2740, 635, 0.046),
             (4.854, -32, -29, -41, 2100, 480, 0.1), (4.898, -34, -31, -41, 2530, 506, 0.044),
             (5.067, -34, -41, -44.5, 1280, 405, 0.11), (5.097, -46, -46, -56, 2000, 612, 0.067)]
def pouring_ice():
    """Cubes stream into each cup; the air inside shifts in pitch as it fills, the walls ring briefly."""
    out = np.zeros(N)
    taps = tiny_taps(per_s=9000, scatter=2.2, ring_s=0.0044, wash=0.88)
    blows = tiny_taps(per_s=9000, scatter=2, ring_s=0.004, wash=0.55)
    for pour, walls in zip(ICE_POURS, WALL_TONES):
        time_s, clatter_db, air_hz = np.transpose(pour)
        start_s, stop_s = time_s[0], time_s[-1]
        tone = colour(ICE_TONE) * peaks(walls, lift_db=6.6)
        low, clatter, high = three_bands(taps, tone, 700, 4300)
        air = unit(moving_band(taps, np.interp(T, time_s, air_hz), width_hz=83.))
        # as the cup fills, the boom dies away much faster than the crackle
        poured_s = np.clip(T - start_s, 0, stop_s - start_s)
        boom = undb(1 - 19 * poured_s) * (air + low) / 2
        crackle = undb(-11 - 3 * poured_s) * high
        level = (T > start_s) * (T < stop_s) * undb(np.interp(T, time_s, clatter_db))
        out += level * (clatter + boom + crackle)
        heaps = [row for row in ICE_HEAPS if start_s < row[0] < stop_s + .2]
        out += flurries(heaps, blows, tone,
                        rise_s=0.01087, air_width_hz=34, air_share=0.83, wall_share=0.6, wall_q=24)
    return out


def scene():
    """Mix the sounds at the counter with their echo and the background hum."""
    near = pouring_ice()
    plastic_taps = tiny_taps(per_s=6000, scatter=2, ring_s=0.0032, wash=.6)
    near += lid(plastic_taps) + handled_cups(plastic_taps) + counter()
    near += pouring_water() + cracking_ice() + plinks() + shifting_ice()
    near += scoop() + jug() + empty_cups() + hiss()
    out = np.zeros(N)
    edges_s = [0] + [stop_s for stop_s, _ in SILENCES] + [N / SR]
    for start_s, stop_s in zip(edges_s, edges_s[1:]):
        stretch = (T >= start_s) & (T < stop_s)  # each echo ends where the next silence begins
        out += stretch * (near + undb(-14.5) * room_echo(near * stretch))
    return (out + fridges_and_fans())[None]


# short silences: stop_s, back_s
SILENCES = [(.3655, .447), (1.4635, 1.554), (2.289, 2.376), (3.066, 3.148), (4.1655, 4.251),
            (5.2155, 5.300)]
def record(dry, creep_s=0.056, top_hz=15700):
    """At each silence the sound stops dead, creeps up, then jumps in. Peaks and top treble are tamed."""
    db = np.zeros(N)
    for stop_s, back_s in SILENCES:
        gap = (T >= stop_s) & (T < back_s)
        db[gap] = np.interp(T[gap] - back_s, [-creep_s, 0], [-66, -8])
    gain = uniform_filter1d(undb(db), size=24)
    rounded = np.tanh(.6 * dry * gain) / .6
    return signal.sosfilt(signal.ellip(12, .3, 90, top_hz, fs=SR, output="sos"), rounded)


dry = scene()
out = record(dry)
file_out(out)
```